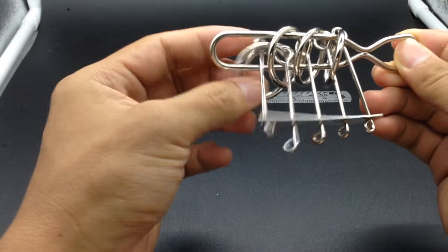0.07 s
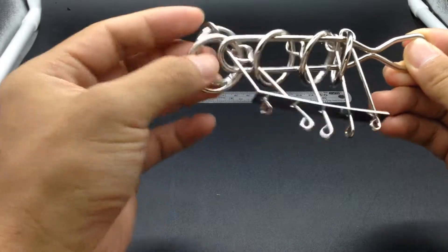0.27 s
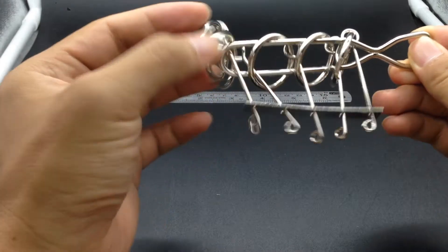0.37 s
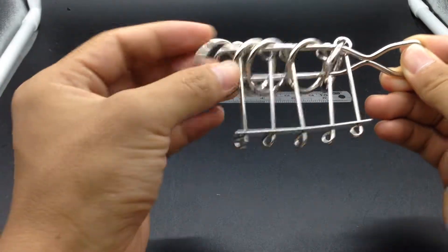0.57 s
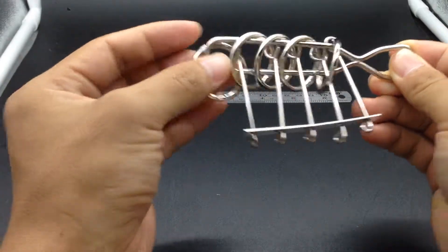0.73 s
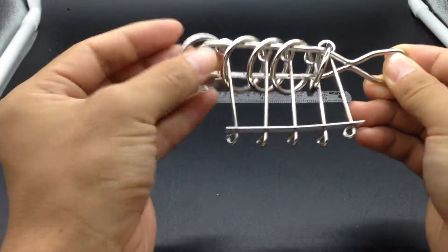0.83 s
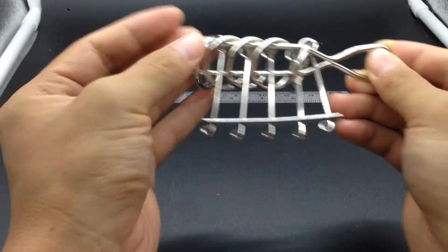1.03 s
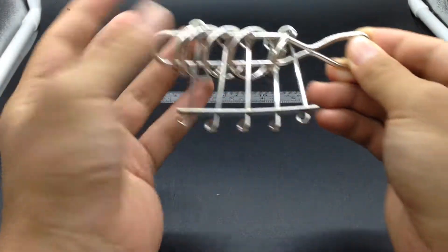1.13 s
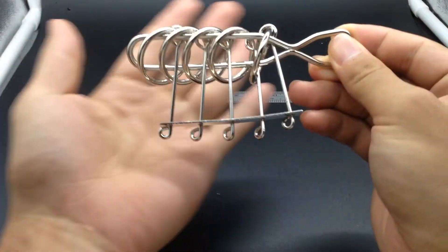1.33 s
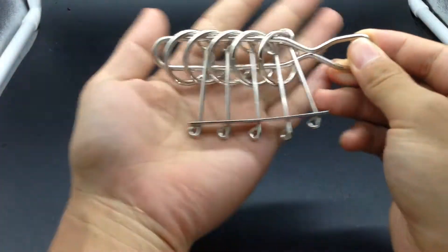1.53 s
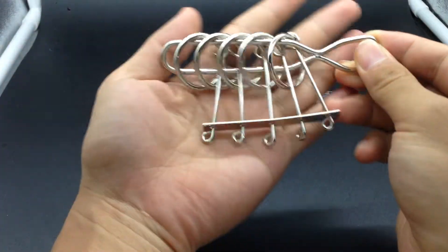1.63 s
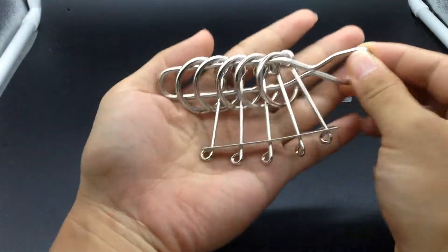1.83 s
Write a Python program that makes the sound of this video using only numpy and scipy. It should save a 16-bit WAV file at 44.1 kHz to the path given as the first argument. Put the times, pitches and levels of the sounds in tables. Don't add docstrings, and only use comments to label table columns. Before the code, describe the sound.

Close, very bright metallic clinks of rings sliding along thin rods swell into busy chatter, thin out, pause briefly, then return as a short shake and last ticks; small dry room, soft fluttering hum behind.

```python
import sys
import numpy as np
from scipy import signal
from scipy.fft import rfft, irfft
from scipy.io import wavfile
from scipy.ndimage import map_coordinates

SR = 44100
rng = np.random.default_rng(int(sys.argv[2]) if len(sys.argv) > 2 else 0)


def makeup_ratio(level_db):
    decades = np.asarray(level_db, float) / 20
    return 10 ** decades


def dump(signal):
    limited = np.clip(np.atleast_2d(signal).T, -1, 1)
    pcm = np.round(limited * 32767).astype(np.int16)
    wavfile.write(sys.argv[1], SR, pcm)


N = 83790

# (time [s], peak level [dB], loudest mode [Hz], T60 [s])
CLINKS = [(0.0054, -38.5, 7840, 0.045), (0.0253, -42, 14000, 0.098), (0.1045, -35.5, 8200, 0.047),
          (0.1269, -40.5, 9300, 0.1), (0.177, -40, 7160, 0.048), (0.1914, -40.5, 13600, 0.083),
          (0.2428, -29.5, 13600, 0.11), (0.3004, -27, 13900, 0.2), (0.3668, -33.5, 12900, 0.17),
          (0.4365, -34, 13900, 0.23), (0.4843, -27, 13600, 0.16), (0.6857, -29.5, 11600, 0.18),
          (0.7163, -27.5, 13600, 0.11), (0.7535, -28, 7940, 0.12), (0.7854, -29, 13100, 0.14),
          (0.8001, -22.5, 10000, 0.046), (0.85, -35.5, 10970, 0.034), (0.8719, -36, 13900, 0.043),
          (0.9058, -45.5, 13500, 0.15), (0.9288, -41.5, 13900, 0.16), (0.9525, -33.5, 13300, 0.072),
          (0.9648, -34.5, 13500, 0.098),
          (1.0765, -35.5, 14200, 0.048), (1.1403, -29.5, 13600, 0.052),
                 (1.1527, -31.5, 13200, 0.031), (1.1727, -22.5, 13260, 0.085), (1.407, -43.5, 5900, .04),
                 (1.4158, -41.5, 10200, 0.054), (1.539, -37, 8680, 0.059), (1.5492, -33.5, 12500, 0.078),
                 (1.5575, -25.5, 9200, 0.14), (1.6432, -31.5, 8500, 0.045), (1.7219, -27.5, 12700, 0.075),
                 (1.7314, -40, 9430, 0.044), (1.7898, -57, 7800, 0.097), (1.8064, -47, 11040, 0.055),
                 (1.8172, -32.5, 9500, 0.059), (1.8914, -63, 8350, 0.058)]
# (time [s], level [dB], loudest mode [Hz], T60 [s], length [s])
CHATTER_RUNS = [(.044, -52, 13700, 0.031, 0.01), (.226, -38, 13600, 0.069, 0.027),
                (.246, -46, 8600, .05, .015), (1.143, -34, 6550, 0.042, 0.014),
                (.272, -34, 10140, 0.08, 0.025), (.31, -32.5, 8570, 0.13, 0.027),
                (.394, -33.5, 12700, 0.093, 0.017), (.45, -48, 13200, 0.053, 0.011),
                (.468, -33, 7830, 0.08, 0.014), (.495, -26, 6930, 0.04, 0.037),
                (.525, -32.5, 12470, 0.18, 0.022), (.545, -28.5, 13300, 0.057, 0.027),
                (.585, -34, 8820, 0.014, 0.013), (.608, -44, 5600, 0.046, 0.0081),
                (.62, -34, 11200, 0.042, .015), (.632, -29, 13300, 0.052, 0.021),
                (.658, -40.5, 13600, 0.11, 0.015), (.808, -28.5, 9900, 0.022, 0.013),
                (.982, -44.5, 13600, .06, 0.017), (1.616, -38.5, 9000, 0.061, 0.026),
                (1.675, -33, 11150, 0.043, 0.0096), (1.688, -37.5, 9100, 0.075, 0.018),
                (1.742, -37.5, 12900, 0.062, 0.0074)]
# (time [s], frequency [Hz], level [dB], free time [s])
FREE_RINGS = [(.484, 13490, -24, .026), (.512, 13490, -39, .018), (.484, 9310, -40, .016),
              (.502, 9310, -37, .03), (.495, 7960, -41, .02), (.47, 13930, -41, .022),
              (.53, 6880, -45, .015), (.316, 13900, -38, .028), (.193, 13580, -51, .022),
              (.663, 9320, -47, .02), (.7165, 13550, -38, .022), (.93, 7940, -54, .024),
              (1.539, 8650, -49, .012), (1.572, 8710, -44, .014), (1.558, 3710, -48, .006),
              (1.562, 5100, -49, .004), (1.817, 9400, -46, .004), (.006, 5720, -52, .006),
              (.722, 9310, -46, .02), (.456, 13550, -44, .015), (.686, 12170, -36, .006),
              (.686, 13150, -37, .005), (.687, 12700, -38, .006), (1.173, 13160, -34, .004),
              (1.557, 8650, -33, .007), (.254, 13590, -43, .01), (.264, 9345, -52, .008),
              (.311, 11000, -44, .014), (.311, 14490, -48, .012), (.308, 8740, -44, .022),
              (.324, 10140, -43, .008), (.302, 7450, -44, .012), (.47, 7970, -45, .009),
              (.473, 6870, -50, .008), (.492, 6910, -45, .01), (.517, 14470, -46, .022),
              (.66, 13500, -47, .014), (.735, 6890, -49, .01), (.931, 13910, -53, .016),
              (.963, 14510, -53, .01), (1.679, 11180, -54, .012), (1.68, 8980, -51, .012),
              (.178, 11100, -55, .009), (.177, 7150, -51, .006), (.609, 5700, -56, .01),
              (1.79, 8000, -62, .01), (1.765, 14000, -61, .015), (1.891, 8600, -60, .006),
              (1.55, 12900, -42, .004)]
# (time [s], frequency [Hz], level [dB], free time [s])
ROD_THUDS = [(1.407, 3870, -56, .005), (1.407, 3010, -57, .005), (1.407, 2280, -62, .005),
             (1.407, 1710, -63, .004), (1.229, 1640, -60, .005), (1.231, 4200, -65, .005),
             (.758, 5230, -50, .005), (1.8175, 5630, -53, .003), (1.8175, 3270, -60, .003),
             (1.111, 8200, -59, .001), (.006, 8200, -51, .007), (.128, 7100, -55, .007),
             (.085, 8800, -61, .003), (.851, 10300, -53, .004)]
RING_MODES = [10160, 10220, 10700, 11450, 11170, 12800, 12470, 12600, 13600, 12800, 13000, 13200, 13400]
ROD_MODES = [3804, 4580, 5040, 5510, 5510, 6760, 6930, 7350, 7940, 8300, 8800, 8870, 9160, 9900]
# (frequency [Hz], density [dB per Hz])
STEEL_COLOUR = [(1500, -23), (2500, -21), (4000, -13), (6500, -6), (9000, -2), (13500, -5), (14700, -2),
                (15600, -24)]
# (time [s], level [dB])
HANDLING_LEVEL = [
    (0, -89),
    (.2, -63),
    (.3, -54),
    (.8, -55),
    (.9, -62),
    (1.12, -63),
    (1.25, -95),
    (1.52, -70),
    (1.58, -52.5),
    (1.9, -67),
]
# (time [s], level [dB], frequency [Hz])
FINGER_TAPS = [
    (1.23, -62, 1880),
    (1.406, -61, 3480),
    (1.817, -53, 4300),
]
# (time [s], peak level [dB], frequency [Hz])
PLATE_KNOCKS = [(.2463, -56.5, 2380), (.3002, -55, 2390), (.3676, -56, 2154), (.4369, -56, 2410),
                (0.4496, -59, 2460), (.5544, -58.5, 2140), (0.685, -51.5, 2384), (0.7158, -56, 2410),
                (.7532, -55, 2470), (0.785, -55.5, 2360), (0.8493, -56, 2410), (0.872, -64, 2080),
                (1.0788, -63, 2555), (1.177, -59, 2430), (1.5744, -62, 2270)]
# (time [s], level [dB])
HUM_LEVEL = [
    (0, -61),
    (.3, -59.5),
    (.55, -60),
    (1.1, -57.5),
    (1.26, -56),
    (1.35, -71),
    (1.6, -61),
    (1.9, -61.5),
]
# (frequency [Hz], density [dB per Hz])
AIR_COLOUR = [(12, -37), (20, -20.5), (74, 2.5), (282, -8), (383, -9), (835, -14.5), (3970, -24.5),
              (5250, -24.5), (15600, -30.5)]
# (frequency [Hz], density [dB per Hz])
RUMBLE_COLOUR = [(120, -40), (190, -6.5), (450, -10), (700, -30.5)]
# (time [s], level [dB])
RUMBLE_LEVEL = [(0, -71.5), (.11, -60), (.2, -63.5), (.5, -64.5), (.6, -64), (.8, -71), (1.1, -67),
                (1.25, -67.5), (1.36, -63), (1.5, -86), (1.9, -65)]

MODES_DB, SCATTER_DB, LOUDEST_DB, HISS_DB, TICK_DB = -16.5, 4.5, -13, -12.5, -28
NEAR_DB, NEAR_OCTAVES = 6, 0.062
CHORD_LIFE = .6
BOUNCE_DB, BOUNCE_S = -10, .008
RATTLES_PER_S, RATTLE_SPREAD_DB, RATTLE_T60_S, RATTLE_DB = 880, 2, 0.013, -5.5
FREE_T60_S, DAMPED_T60_S, RING_ATTACK_S = .3, .035, .0015
PLATE_DB, PLATE_T60_S, PLATE_ROUGH = -1, .05, 1.1
TAP_T60_S = 0.094
MOTOR_HZ, MAINS_HZ, IN_STEP_S = 87.93, 100, .742
MAINS_DB, OCTAVE_DB, AIR_DB = -1.5, -9, -60
WHINE_HZ, WHINE_DB = 881, -77
ROOM_DB, ROOM_T60_S = -16, 0.13
TOP_HZ = 15700


def unit(x):
    return x / np.sqrt(np.mean(x ** 2) + 1e-20)


def curve(rows):
    s, value = np.transpose(rows)
    return np.interp(np.arange(N) / SR, s, value)


def wobble(rate, size=N):
    return map_coordinates(rng.standard_normal(200), [np.arange(size) * rate / SR])


def noise(spectrum, size, near_hz=None):
    hz = np.fft.rfftfreq(size, 1 / SR) + 1
    f, db = np.transpose(spectrum)
    level_db = np.interp(np.log(hz), np.log(f), db)
    if near_hz:
        level_db = level_db + NEAR_DB * np.exp(-(np.log2(hz / near_hz) / NEAR_OCTAVES) ** 2)
    return unit(irfft(rfft(rng.standard_normal(size)) * makeup_ratio(level_db), size))


def fall(t, t60):
    return (t >= 0) * makeup_ratio(-60 * np.abs(t) / np.clip(t60, .004, 2))


def rise(t, attack_s):
    return 1 - np.exp(-t / attack_s)


def add(out, s, x):
    out[round(s * SR):][:len(x)] += x


def chord(t, t60):
    hz = np.array([*RING_MODES, *ROD_MODES])[:, None]
    f, db = np.transpose(STEEL_COLOUR)
    draw = rng.standard_normal((4, len(hz), 1))
    size = makeup_ratio(1.93 * np.interp(hz, f, db) + SCATTER_DB * draw[0])
    phase = np.float32(2 * np.pi * hz * (1 + .003 * draw[1]) * t + 9 * draw[2])
    life = t60 * makeup_ratio(np.clip(2 * draw[3], -4, 1))
    dying = np.float32(-np.log(1000) * t / life)
    modes = size * (np.sin(phase) * np.exp(dying))
    return modes.sum(0) / np.sqrt(np.sum(size ** 2) / 2)


def contact(hz, t60):
    t = np.arange(4096) / SR
    envelope = makeup_ratio(HISS_DB) * fall(t, t60) + makeup_ratio(TICK_DB) * fall(t, 0.0027)
    hiss = noise(STEEL_COLOUR, len(t), hz) * envelope
    loudest = makeup_ratio(LOUDEST_DB) * np.sin(2 * np.pi * hz * t) * fall(t, 0.19 * t60)
    modes = makeup_ratio(MODES_DB) * chord(t, np.clip(CHORD_LIFE * t60, .015, .06))
    return (hiss + loudest + modes) * rise(t, 0.00028)


def room_tone():
    t = 2 * np.pi * (np.arange(N) / SR - IN_STEP_S)
    tones = np.cos(MOTOR_HZ * t) + makeup_ratio(MAINS_DB) * np.cos(MAINS_HZ * t)
    overtones = np.cos(2 * MAINS_HZ * t + wobble(14))
    overtones += 0.52 * np.cos(2 * MOTOR_HZ * t + wobble(9.0))
    overtones += .5 * np.cos(374 * t + wobble(26.2))
    octave = makeup_ratio(OCTAVE_DB + 4.5 * wobble(29.23)) * overtones
    hum = makeup_ratio(curve(HUM_LEVEL)) * (makeup_ratio(1.6 * wobble(4.3)) * tones + octave)
    rumble = makeup_ratio(curve(RUMBLE_LEVEL) + 4.67 * wobble(11.7)) * noise(RUMBLE_COLOUR, N)
    whine = makeup_ratio(WHINE_DB + 0.6 * wobble(4.5)) * np.cos(WHINE_HZ * t + wobble(8.16))
    air = makeup_ratio(AIR_DB + wobble(10.4) / 2) * noise(AIR_COLOUR, N)
    return rumble + whine + hum + air


def rattle(count=12):
    out = np.zeros(N)
    for _ in range(count):
        struck = rng.random(N) < RATTLES_PER_S / count / SR
        hits = struck * makeup_ratio(RATTLE_SPREAD_DB * rng.standard_normal(N))
        response = contact(rng.choice([*RING_MODES, *ROD_MODES]), RATTLE_T60_S)
        out += signal.fftconvolve(hits, response)[:N]
    return unit(out) * makeup_ratio(curve(HANDLING_LEVEL) + RATTLE_DB)


def repeat_impacts(out, s, db, pair, when, size, length_s):
    gains = size * makeup_ratio(rng.normal(0, 1.34, len(when)))
    for k, gain in enumerate(gains):
        add(out, s + when[k] * length_s, makeup_ratio(db) * gain * pair[k % 2])


def impact_times(count=7):
    return (np.arange(count) + rng.random(count)) / count


def clinks():
    out = np.zeros(N + SR)
    for s, db, hz, t60 in CLINKS:
        pair = [contact(hz, t60), contact(hz, t60)]
        when = impact_times()
        add(out, s, makeup_ratio(db) * pair[0])
        repeat_impacts(out, s, db, pair, when, makeup_ratio(BOUNCE_DB) * (1 - 0.82 * when), BOUNCE_S)
    return out[:N]


def ringing():
    out, t = np.zeros(N + SR), np.arange(8192) / SR
    for rows, waver in ((FREE_RINGS, .3), (ROD_THUDS, .9)):
        for s, hz, db, free_s in rows:
            damping = fall(np.maximum(t - free_s, 0), DAMPED_T60_S)
            shape = fall(t, FREE_T60_S) * damping * rise(t, RING_ATTACK_S)
            level = makeup_ratio(db + 4 * waver * wobble(200, len(t)))
            tone = np.sin(2 * np.pi * hz * t + waver * wobble(200, len(t)))
            add(out, s, level * shape * tone)
    return out[:N]


def chatter():
    out = np.zeros(N + SR)
    for s, db, hz, t60, length_s in CHATTER_RUNS:
        pair = [contact(hz, t60), contact(hz, t60)]
        when = impact_times()
        repeat_impacts(out, s, db, pair, when, 0.81 * np.sin(np.pi * when), length_s)
    return out[:N]


def plate():
    out, t = np.zeros(N + SR), np.arange(2048) / SR
    for s, db, hz in PLATE_KNOCKS:
        phase = 2 * np.pi * hz * t
        tone = np.sin(phase + wobble(270, len(t))) + .4 * np.sin(phase)
        rough = PLATE_ROUGH * noise([(1300, -18), (2000, -1.5), (2500, 5.5), (3300, -9)], len(t))
        add(out, s, makeup_ratio(db + PLATE_DB) * (tone + rough) * fall(t, PLATE_T60_S) * rise(t, 0.00083))
    return out[:N]


def tap():
    out, t = np.zeros(N), np.arange(N) / SR
    for s, db, hz in FINGER_TAPS:
        colour = [(hz / 4, -30), (hz / 2, -9), (hz, 0), (1.5 * hz, -3), (3 * hz, -20)]
        out += makeup_ratio(db) * fall(t - s, TAP_T60_S) * noise(colour, N)
    return out


def reverberation(steel):
    t = np.arange(8192) / SR
    tail = rng.standard_normal(len(t)) * fall(t - .003, ROOM_T60_S)
    return makeup_ratio(ROOM_DB) * signal.fftconvolve(steel, tail / np.linalg.norm(tail))[:N]


def scene():
    air = room_tone()
    steel = rattle() + clinks() + ringing() + chatter() + plate() + tap()
    return (steel + reverberation(steel) + air)[None]


def roll_off(x):
    return signal.sosfilt(signal.butter(12, 15700, fs=SR, output="sos"), x)


def record(dry):
    passed = np.fft.rfftfreq(N, 1 / SR) < TOP_HZ
    limited = irfft(rfft(dry) * passed, N)
    return roll_off(limited)


dry = scene()
out = record(dry)
dump(out)
```